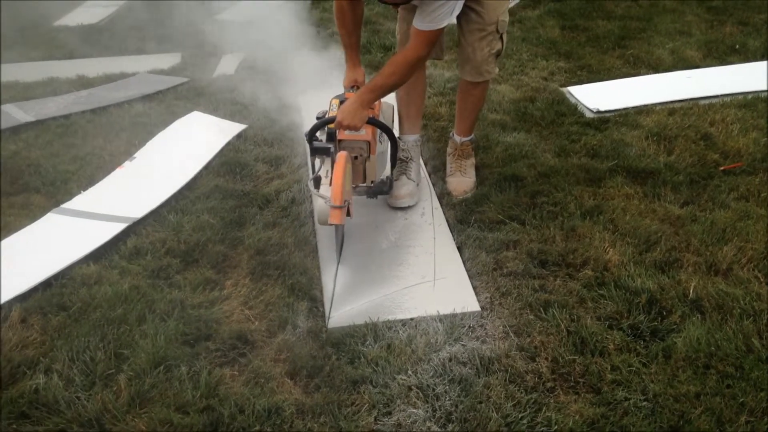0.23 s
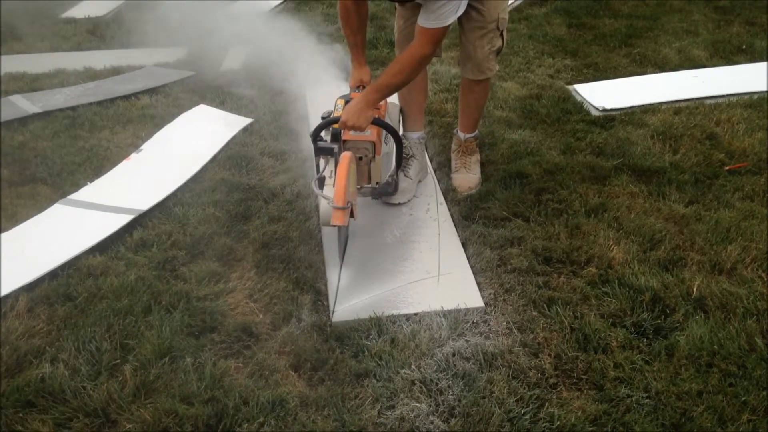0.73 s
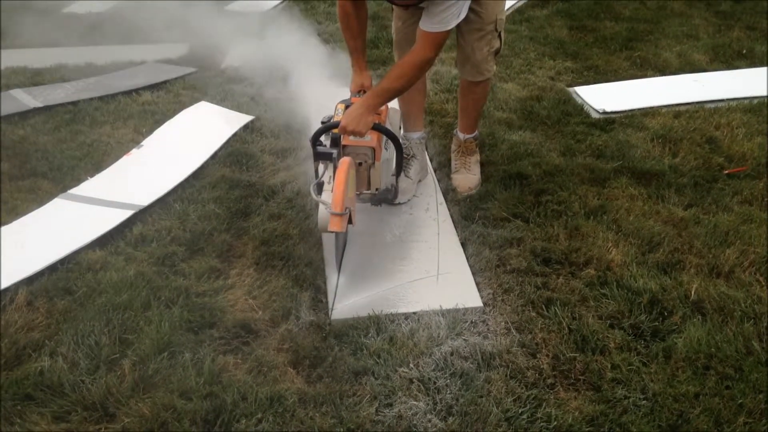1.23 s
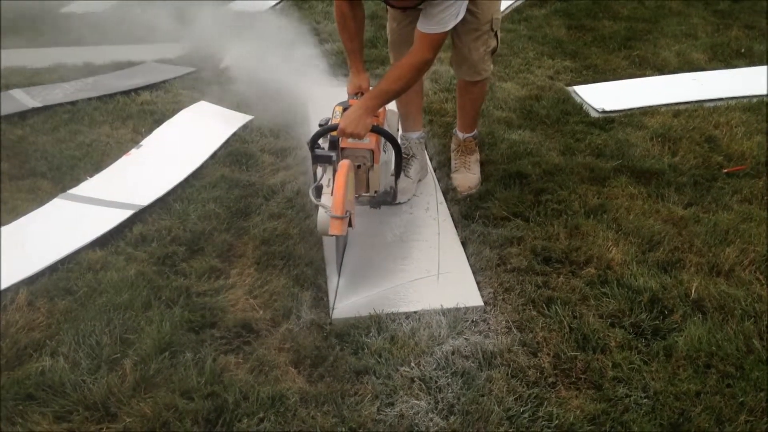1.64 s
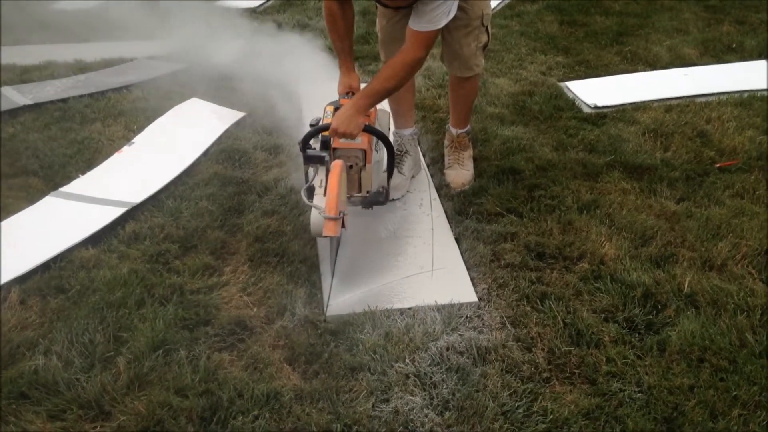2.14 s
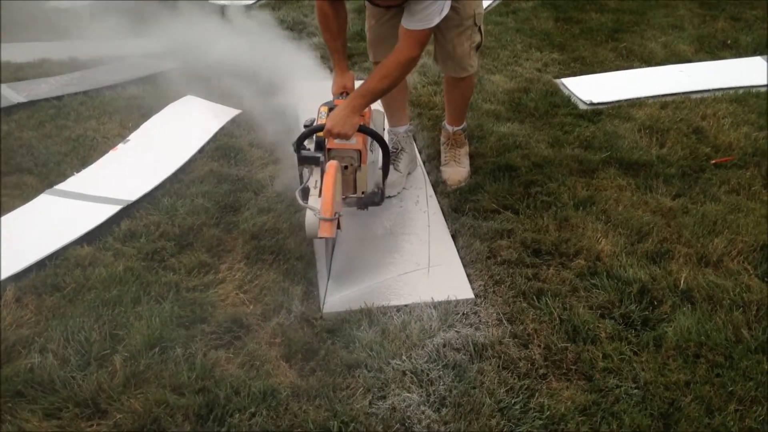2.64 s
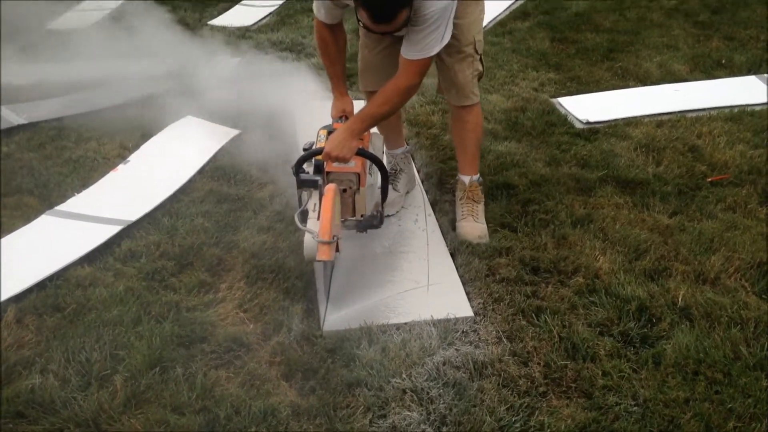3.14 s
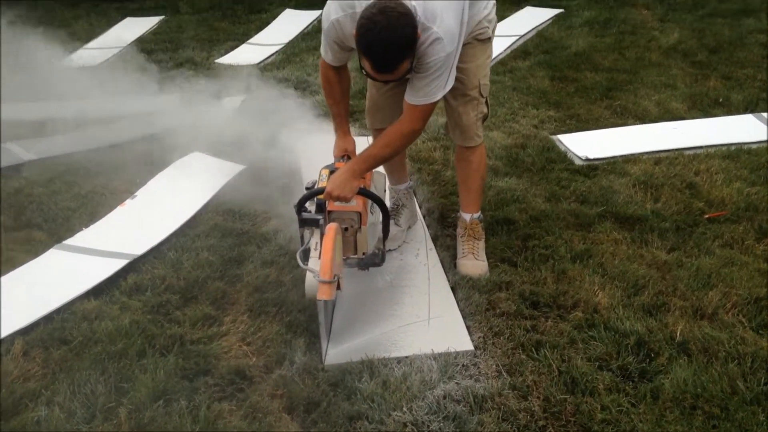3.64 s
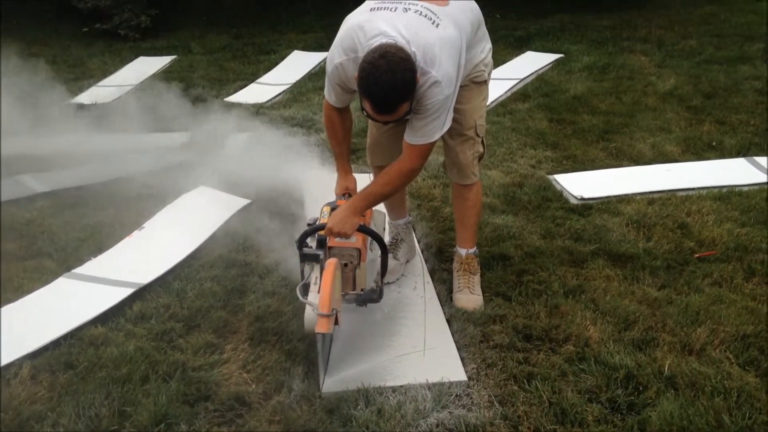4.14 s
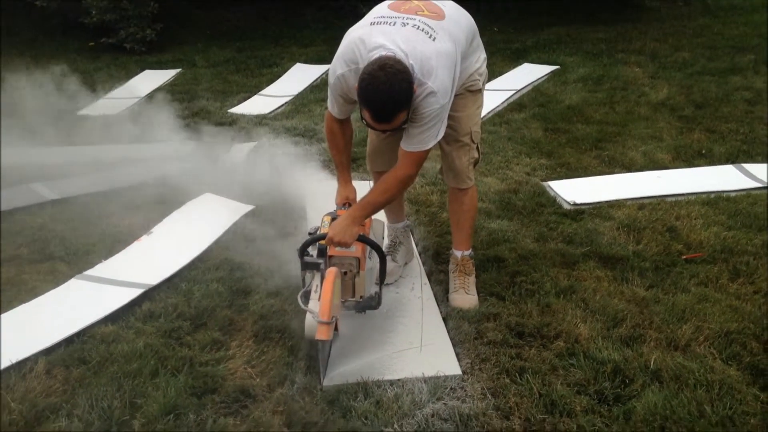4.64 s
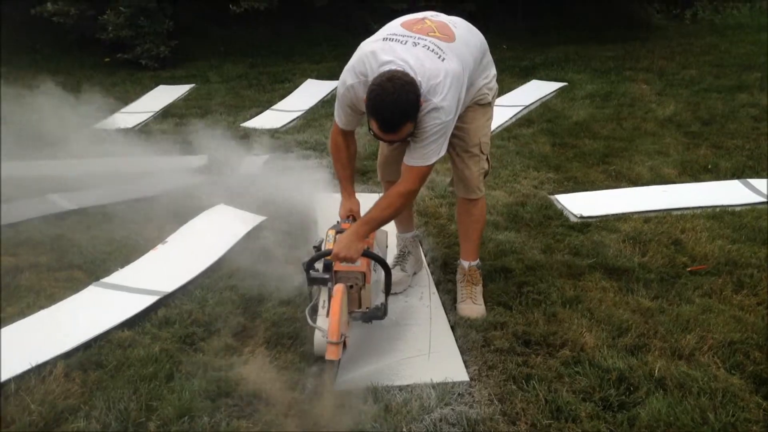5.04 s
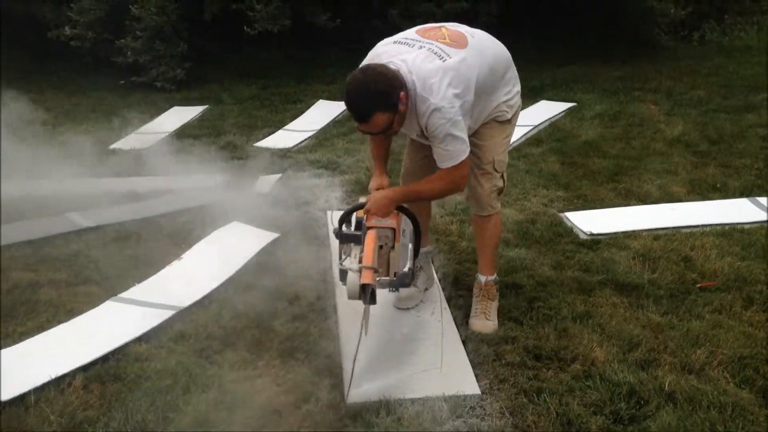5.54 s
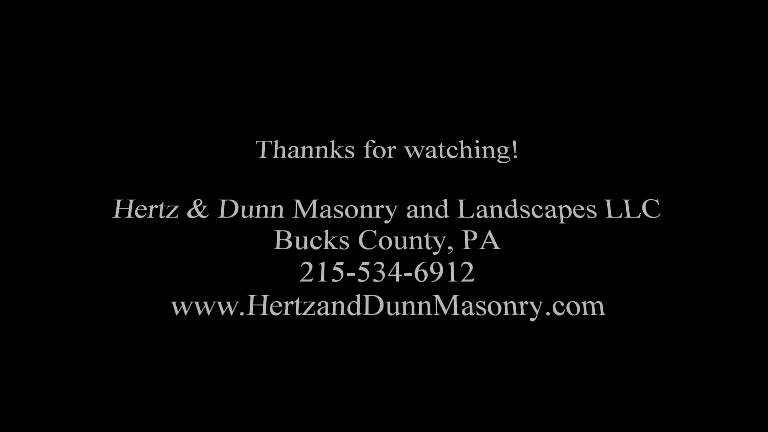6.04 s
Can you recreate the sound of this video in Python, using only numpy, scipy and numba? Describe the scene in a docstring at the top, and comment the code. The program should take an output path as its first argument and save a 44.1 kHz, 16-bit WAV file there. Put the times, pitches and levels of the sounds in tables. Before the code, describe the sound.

Already at full speed, a handheld two-stroke cut-off saw drones and rasps close by while its steel disc grinds stone with a bright, harsh, metallic scrape and gritty hiss. Pitch and pressure waver slightly. The whole sound fades from midway; near the end the rim chatters, the blade lifts, the engine begins to slow, and two faint dull thuds touch the microphone before silence. Dry, mono, outdoors.

```python
"""A droning, rasping engine and a scraping blade: a two-stroke cut-off saw grinds through a stone slab.
The engine sums shaft-locked partials and rings its muffler with puffs of gas at each firing.
The rim scrapes the stone as filtered noise, chatters and rings the steel blade, and throws a hiss of grit.
Near the end the rim bounces, the blade lifts, the engine starts to slow and two dull bumps sound.
The sound is mono, alike on both channels; the saw fades away over the last part."""
import sys
import numpy as np
from scipy import signal
from scipy.fft import rfft, irfft, next_fast_len
from scipy.io import wavfile
from numba import njit

SR = 44100
rng = np.random.default_rng(int(sys.argv[2]) if len(sys.argv) > 2 else 0)


def inscribe(sig):
    """Save sig as 16-bit PCM at rate SR to the path in sys.argv[1].

    A 1-D sig is mono; a 2-D sig holds one channel per row.
    Samples are clipped to [-1, 1] before scaling.
    """
    pcm = np.round(np.clip(np.atleast_2d(sig).T, -1, 1) * 32767)
    wavfile.write(sys.argv[1], SR, pcm.astype(np.int16))


N = 277817
TIME = np.arange(N) / SR

# the blade leaves the stone
LIFT_S, LIFT_TAKES_S = 5.36, 0.063
# straight edges of every swell
SWELL_EDGE_S = 0.07
# near the end of the cut the rim bounces on the stone once a turn: start_s, length_s, strength (0-1)
RIM_BOUNCES = [(4.91, .38, 1)]


def undb(db):
    """Level to amplitude: 20 dB is a factor of ten."""
    return 10 ** (np.asarray(db) / 20)


def curves(table):
    """Linear interpolation turns each column after the time into a curve over all samples."""
    s, *columns = np.transpose(table)
    return [np.interp(TIME, s, column) for column in columns]


def unit(x):
    """Normalisation to an rms of 1."""
    return x / np.sqrt(np.mean(x ** 2))


def walk(rate):
    """Band-limited random modulation: straight lines join `rate` random values a second, rms 1."""
    steps = rng.standard_normal(4096)
    return unit(np.interp(TIME * rate + rng.random(), np.arange(4096), steps))


def ramp(start, length):
    """Linear transition from 0 to 1."""
    return np.clip((TIME - start) / length, 0, 1)


def swells(table):
    """Trapezoidal envelopes that rise, hold and fall, each to its own height."""
    total = 0
    for s, length, height in table:
        rise = ramp(s - SWELL_EDGE_S / 2, SWELL_EDGE_S)
        fall = ramp(s + length - SWELL_EDGE_S / 2, SWELL_EDGE_S)
        total = total + height * (rise - fall)
    return total


def colour(x, spectrum, modes=()):
    """Source-filter shaping: noise takes a spectrum in dB per Hz, changed around each resonance."""
    hz = np.linspace(0, SR / 2, next_fast_len(N) // 2 + 1)
    points, levels = np.transpose(spectrum)
    db = np.interp(np.log(hz + 1), np.log(points), levels)
    for centre, width, lift in modes:
        db = db + lift / (1 + (2 * (hz - centre) / width) ** 2)
    shaped = irfft(rfft(x, 2 * (len(hz) - 1)) * undb(db))[:N]
    return shaped * np.sqrt(SR / 2)


def partial(cycles, waver, rate):
    """Quadrature modulation: two random walks vary the strength and phase of a sine of nominal rms 1."""
    angle = 2 * np.pi * cycles
    wave = (1 + waver * walk(rate)) * np.sin(angle) + waver * walk(rate) * np.cos(angle)
    return wave * np.sqrt(2 / (1 + 2 * waver ** 2))


def narrow_noise(hz, width):
    """Random excitation of a narrow mode: two walks modulate a sine and a cosine at its frequency."""
    angle = 2 * np.pi * hz * TIME
    return walk(width) * np.sin(angle) + walk(width) * np.cos(angle)


def tone_levels(sag_hz, off_throttle):
    """Load dependence of the engine resonances: each level follows speed sag and throttle."""
    # level_db, start_offset_db, drift_db_per_s, load_db_per_sag_hz, off_throttle_db, wander_db
    tone_rules = {"boom": (0.3, 0.5, 0, -0.5, -14, 0.4), "hum": (0.038, 0, 0.43, 1.5, -1, 0.73),
                  "drone": (-4, 1.5, 1.06, 3.5, -7.5, 1), "growl": (-3, 7.5, 0, -1, -6, 3),
                  "low pipe": (3, -7.5, -0.93, 1, -23, 1.1), "mid pipe": (-0.8, 1.5, .1, 4, 1, 2),
                  "high pipe": (-1.84, -6, 0.8, 0.5, -3, -0.6),
                  "housing": (-0.75, -1, -0.42, 5.5, -16, 0.26)}
    # a resonance sings out for a moment: start_s, length_s, lift_db, resonance (name)
    tone_swells = [(.19, 0.23, 6.5, "mid pipe"), (0.276, 0.1, 6, "housing"), (0.692, .4, 5, "mid pipe"),
                   (.76, 0.089, 5, "housing"), (1.26, 0.11, 4, "housing"), (3.85, 0.51, 10, "drone"),
                   (4.117, .3, 5, "housing"), (5.0, 0.27, 6.5, "drone")]
    levels = {}
    unsettled = 1 - ramp(0, 0.9)
    for name, (db, start_db, drift_db, load_db, off_db, wander_db) in tone_rules.items():
        singing = swells([swell for *swell, resonance in tone_swells if resonance == name])
        levels[name] = (db + start_db * unsettled + drift_db * TIME + load_db * sag_hz
                        + off_db * off_throttle + wander_db * walk(5) + singing)
    return levels


def engine(firings, levels, chatter_db, smear, knock_smear):
    """Fourier series of exhaust pulses and a knock once a turn; phase scatter (cycles) smears each pulse."""
    # engine partials before their moving levels: multiple_of_firing_rate, level_db
    engine_orders = [(0.5, -46.5), (1.0, -30), (1.5, -44.5), (2.0, -33), (2.5, -40.5), (3.0, -40),
                     (3.5, -43), (4.0, -32), (4.5, -42.5), (5.0, -38.5), (5.5, -43), (6.0, -41.5),
                     (6.5, -47.5), (7.0, -30), (7.5, -38.5), (8.0, -42), (8.5, -38), (9.0, -40.5),
                     (9.5, -48), (10.0, -36.5), (10.5, -35.5), (11.0, -28.5), (11.5, -31.5), (12.0, -44.5),
                     (12.5, -43), (13.0, -46), (13.5, -40.5), (14.0, -41), (14.5, -37.5), (15.0, -44)]
    # partials that each resonance carries: lowest_multiple, highest_multiple (of the firing rate)
    tone_ranges = {"boom": (1, 1), "hum": (2, 2), "drone": (2.5, 2.5), "growl": (3, 3), "low pipe": (4, 4),
                   "mid pipe": (4.5, 5.5), "high pipe": (7, 7.5), "housing": (10, 12)}
    out = 0
    for multiple, db in engine_orders:
        resonances = [levels[name] for name, (low, high) in tone_ranges.items() if low <= multiple <= high]
        # whole multiples line up into firing pulses; the halves between them are more scattered
        scatter = knock_smear if multiple % 1 else smear
        cycles = multiple * firings + scatter * rng.standard_normal()
        if resonances:
            # the pipe holds these partials firm
            tone = partial(cycles, waver=0.03 + 0.093 * np.log10(multiple), rate=9.7)
            out = out + undb(db + resonances[0]) * tone
        else:
            out = out + undb(db + 0.96 * chatter_db) * partial(cycles, waver=0.32, rate=5)
    return out


def rasp_level(sag_hz, off_throttle):
    """Load dependence of the exhaust noise, in dB, with a cough as the blade bites once more."""
    # start_s, length_s, lift_db
    coughs = [(4.84, .07, 4)]
    load_db = -1 * sag_hz  # falls 1 dB for each Hz of sag
    return -0.05 + load_db + 0.22 * TIME - 1.5 * off_throttle + 0.9 * walk(8) + swells(coughs)


def exhaust_rasp(firings, depth, scatter_db):
    """Pulsed turbulence: a puff of gas at each firing, each of its own strength, rings the muffler."""
    # exhaust gas before its moving level: pitch_hz, level_db (per Hz)
    gas = [(20, -94.5), (75, -70.5), (220, -69), (400, -67), (490, -70), (620, -67), (1000, -66.5),
           (1500, -60.5), (2200, -62), (3300, -60.5), (4200, -59.5), (5000, -71), (9000, -91)]
    # resonances and one hollow of the muffler and housing: pitch_hz, width_hz, lift_db
    muffler_modes = [(779, 270, 4), (1806, 240, 5), (2290, 220, -5)]
    strength = undb(scatter_db * rng.standard_normal(2048))[firings.astype(int)]
    puff = np.exp(-depth * np.cos(2 * np.pi * firings)) * strength
    return colour(unit(puff * rng.standard_normal(N)), gas, muffler_modes)


def cut_levels():
    """Friction grows with pressure: levels in dB of grinding, grit and chatter follow the feed and the lift."""
    # how hard the blade is pressed into the stone: time_s, feed_db
    feed = [(0, 1), (.35, 2), (.55, 0.5), (1.25, 1.6), (1.48, -.5), (2.05, 1), (2.9, 0.5), (3.2, 1.5),
            (3.65, -3), (3.85, -0.5), (4.25, -1.5), (4.66, -1.5), (4.79, 1), (4.99, -5), (5.22, -2),
            (5.34, 0.5)]
    # level_db, follow_db_per_feed_db, bouncing_db, lifted_db, wander_db
    cut_rules = {"grinding": (0.45, 1.05, -.8, -15, 0.44), "grit": (0.6, 0.7, -1, -15, 1),
                 "chatter": (0.4, 0.12, 1.5, -3.5, 0.36)}
    feed_db, = curves(feed)
    bouncing, lifted = swells(RIM_BOUNCES), ramp(LIFT_S, LIFT_TAKES_S)
    return [db + follow * feed_db + bounce_db * bouncing + lifted_db * lifted + wander_db * walk(8)
            for db, follow, bounce_db, lifted_db, wander_db in cut_rules.values()]


def rim_contact(turns):
    """Amplitude modulation once a turn as the rim bounces, normalised to keep its mean power."""
    depth = 0.5 * swells(RIM_BOUNCES)
    return (1 + depth * np.cos(2 * np.pi * turns)) / np.sqrt(1 + depth ** 2 / 2)


@njit
def repeat_each_turn(x, period, share):
    """Recirculating delay: feed back a share of what sounded one turn (period in samples) earlier."""
    y = x.copy()
    for i in range(len(x)):
        back = i - period[i]
        if back >= 0:
            k = int(back)
            y[i] += share * (y[k] + (back - k) * (y[k + 1] - y[k]))
    return y


def grinding(turn_hz, turns, repeat, flutter_db, sway_db):
    """Abrasive friction noise: the rim tears grains, and part of the scraping returns with every turn."""
    # noise of the rim on stone before its moving level: pitch_hz, level_db (per Hz)
    grind = [(300, -87.5), (2000, -64), (2850, -58.5), (3080, -51), (3600, -49.5), (4100, -52.5),
             (4350, -56.5), (5100, -61.5), (6750, -60.5), (7350, -72), (9000, -76), (12000, -97)]
    # resonances of the steel blade in the cut: pitch_hz, width_hz, lift_db
    blade_modes = [(2334, 160, 8.5), (3327, 160, 4.5), (3647, 230, 5), (4040, 120, 7), (4566, 120, 4.5),
                   (5970, 200, 7.5), (6800, 200, 1)]
    scrape = repeat_each_turn(rng.standard_normal(N), SR / turn_hz, repeat)
    pressure = undb(flutter_db * walk(260) + sway_db * walk(45)) * rim_contact(turns)
    return colour(unit(scrape * pressure), grind, blade_modes)


def blade_chatter(turns, spread, waver):
    """Bending-wave dispersion: each knock of the blade in its slot smears into a short upward chirp."""
    # partials the shaking saw drives, before their moving level: multiple_of_turn_rate, level_db
    blade_orders = [(32, -41), (33, -38), (35, -38), (37, -35.5), (38, -28), (39, -35), (40, -33.5),
                    (41, -33.5), (42, -35), (43, -32), (44, -23), (45, -29), (46, -27.5), (47, -39.5),
                    (48, -33.5), (49, -40.5), (50, -41), (51, -37), (52, -42), (55, -40.5), (56, -36.5),
                    (58, -50), (64, -43.5), (68, -44), (73, -43), (74, -41), (80, -41.5), (84, -47.5)]
    out = 0
    for multiple, db in blade_orders:
        # a phase lag growing with the square of the multiple delays the higher partials
        cycles = multiple * turns - multiple ** 2 / spread + 0.13 * rng.standard_normal()
        out = out + undb(db) * partial(cycles, waver, rate=4.55)
    return out


def grit(spurt_db, grain_db):
    """Modulated broadband noise: stone dust leaves the cut in small uneven spurts."""
    # spray of grit before its moving level: pitch_hz, level_db (per Hz)
    spray_spectrum = [(2000, -85.5), (6000, -70.5), (8200, -69.5), (9300, -73), (11000, -79),
                      (13000, -76.5), (15300, -80)]
    spray = undb(spurt_db * walk(70) + grain_db * walk(500))
    return colour(unit(spray * rng.standard_normal(N)), spray_spectrum)


def blade_ring():
    """Modal vibration: shaking keeps a few narrow modes of the disc sounding, in and out of the cut."""
    # pitch_hz, width_hz, level_db (rms before the fade)
    ring_modes = [(2113, 89, -43.5), (3184, 27, -33.5), (3250, 38, -27), (3930, 15, -33), (4124, 40, -33),
                  (5420, 25, -45)]
    out = 0
    for hz, width, db in ring_modes:
        out = out + undb(db) * narrow_noise(hz, width)
    return out


def release_ring():
    """Free decay: one mode of the disc rings out as the rim comes free."""
    pitch_hz, decay_s, level_db = 4010, 0.06, -17
    age = np.maximum(TIME - LIFT_S - LIFT_TAKES_S / 2, 0)
    swing = ramp(LIFT_S, LIFT_TAKES_S / 2) * np.exp(-age / decay_s)
    return undb(level_db) * swing * np.sin(2 * np.pi * pitch_hz * TIME)


def slab_ring():
    """Broad resonance: the stone rings more freely towards the end of the cut, less once the blade lifts."""
    pitch_hz, width_hz, level_db, lifted_db = 2120, 260, -29, -6
    start_s, rise_s = 4.35, 0.49
    strength = undb(level_db + lifted_db * ramp(LIFT_S, LIFT_TAKES_S)) * ramp(start_s, rise_s)
    return strength * narrow_noise(pitch_hz, width_hz)


def bumps():
    """Damped oscillation: dull, quickly decaying thuds on the microphone."""
    # start_s, pitch_hz, decay_s, level_db (amplitude before decay)
    thuds = [(5.512, 72, 0.011, -33.5), (5.539, 120, .005, -42)]
    out = 0
    for s, hz, decay, db in thuds:
        age = np.maximum(TIME - s, 0)
        out = out + undb(db) * np.sin(2 * np.pi * hz * age) * np.exp(-age / decay)
    return out


def scene():
    """Superposition of sources locked to one shaft; the saw fades to silence beneath the bumps."""
    # shaft speed under throttle, sagging when the blade bites: time_s, turn_hz; two firings a turn
    speed = [(0.12, 81.1), (0.38, 80.47), (0.7, 80.6), (1.25, 80.6), (1.45, 81.1), (1.8, 81.2),
             (2.15, 80.6), (2.4, 80.5), (3.45, 80.5), (3.88, 81.0), (4.25, 81.1), (4.7, 81.05),
             (4.86, 80.5), (5.2, 80.67), (5.33, 80.94)]
    cruise_hz = 80.75
    # the throttle is let go and the shaft runs down
    throttle_off_s, throttle_close_s, run_down_hz_per_s = 5.33, 0.14, 13.8
    driven_hz, = curves(speed)
    turn_hz = driven_hz - run_down_hz_per_s * np.maximum(TIME - throttle_off_s, 0)
    sag_hz = cruise_hz - driven_hz
    off_throttle = ramp(throttle_off_s, throttle_close_s)
    grind_db, grit_db, chatter_db = cut_levels()
    rasp_db = rasp_level(sag_hz, off_throttle)
    # every firing comes a little early or late
    turns = 1 + np.cumsum(turn_hz) / SR + 0.00041 * walk(90)

    saw = engine(2 * turns, tone_levels(sag_hz, off_throttle), chatter_db, smear=0.16, knock_smear=0.21)
    saw = saw + undb(rasp_db) * exhaust_rasp(2 * turns + 0.5, depth=0.62, scatter_db=3.0)
    saw = saw + undb(grind_db) * grinding(turn_hz, turns, repeat=0.38, flutter_db=0.5, sway_db=1.17)
    saw = saw + undb(chatter_db) * rim_contact(turns) * blade_chatter(turns, spread=27, waver=0.33)
    saw = saw + undb(grit_db) * grit(spurt_db=1.0, grain_db=0.5)
    saw = saw + blade_ring() + release_ring() + rim_contact(turns) * slab_ring()

    fade_start_s, fade_zero_s, stop_s = 3.3, 5.68, 5.613
    fade = np.clip((fade_zero_s - TIME) / (fade_zero_s - fade_start_s), 0, 1)
    # the last of the sound drops away in two quick steps
    fade = fade * np.interp(TIME - stop_s, [0, 0.002, 0.033, 0.036], [1, 0.14, 0.2, 0])
    return np.tile(saw * fade + bumps(), (2, 1))


def record(dry):
    """Soft saturation rounds the highest peaks; a steep low-pass removes the top."""
    top_hz = 15150
    rounded = dry / (1 + (dry / 0.82) ** 8) ** (1 / 8)
    low_pass = signal.ellip(10, 0.1, 80, top_hz, fs=SR, output="sos")
    return signal.sosfilt(low_pass, rounded)


dry = scene()
out = record(dry)
inscribe(out)
```